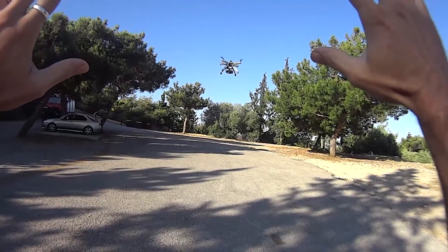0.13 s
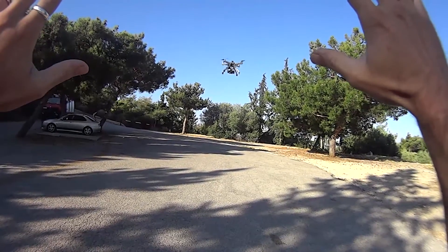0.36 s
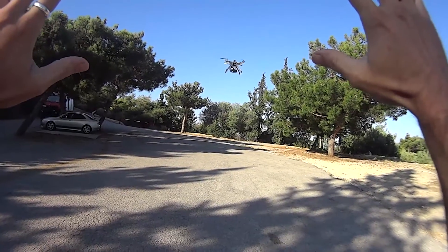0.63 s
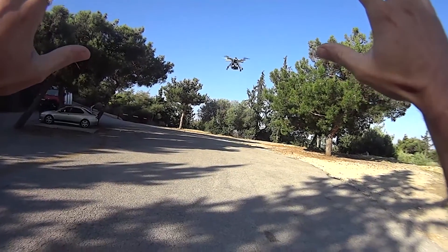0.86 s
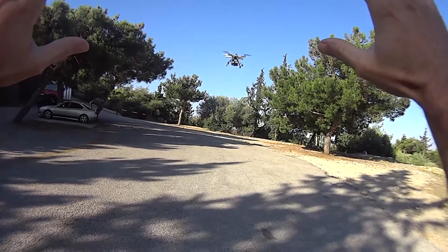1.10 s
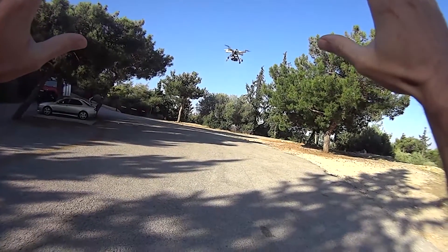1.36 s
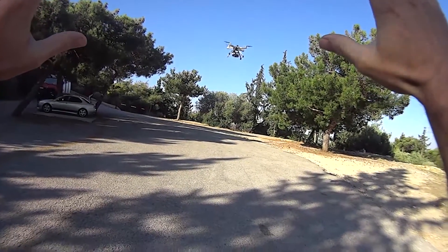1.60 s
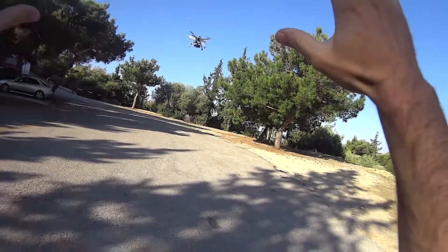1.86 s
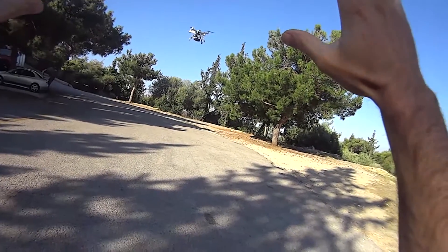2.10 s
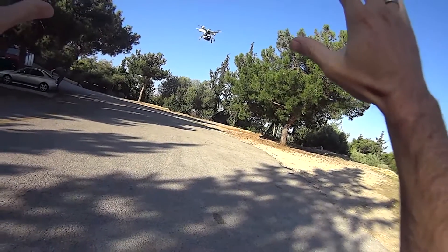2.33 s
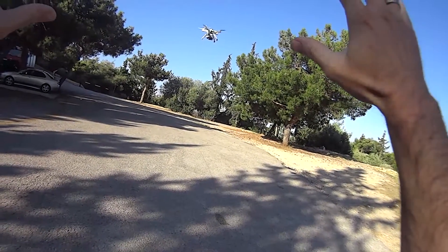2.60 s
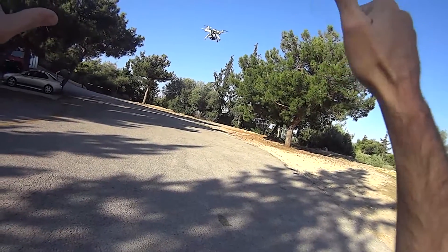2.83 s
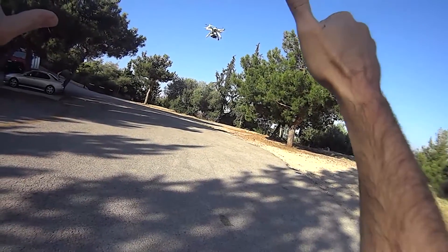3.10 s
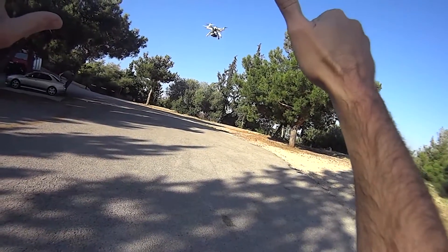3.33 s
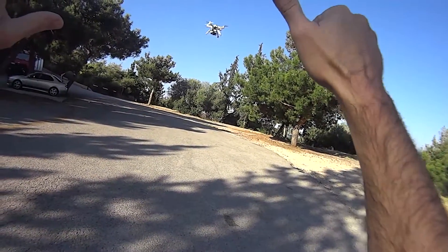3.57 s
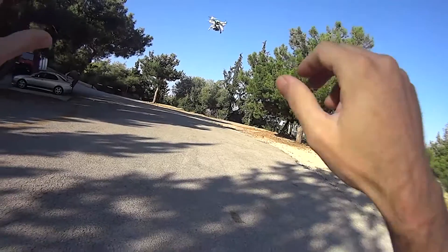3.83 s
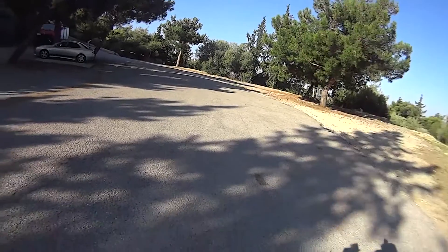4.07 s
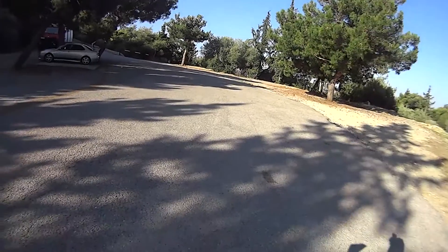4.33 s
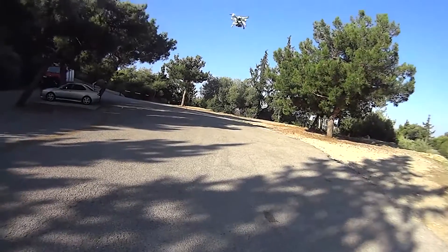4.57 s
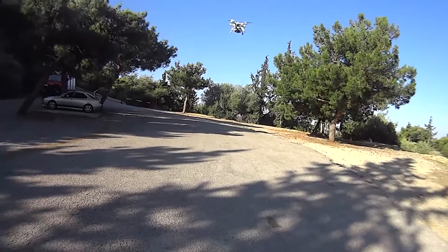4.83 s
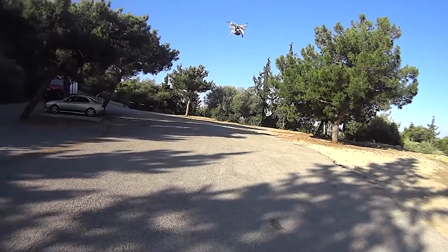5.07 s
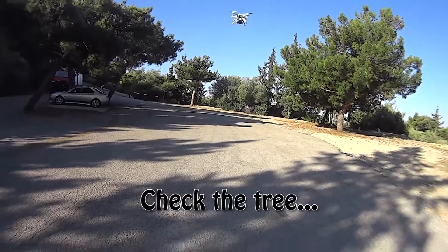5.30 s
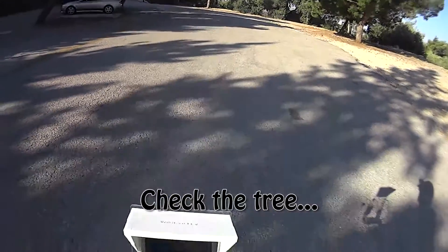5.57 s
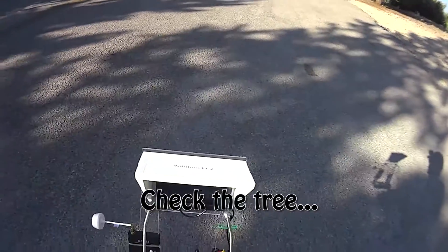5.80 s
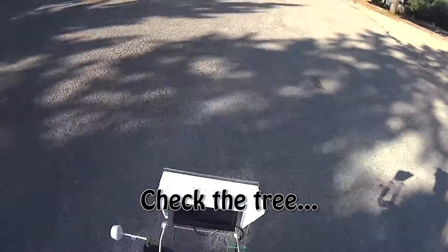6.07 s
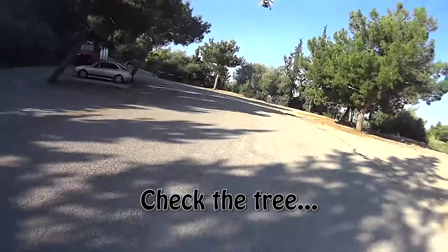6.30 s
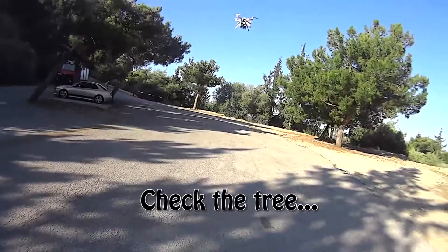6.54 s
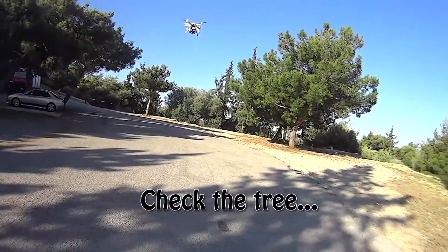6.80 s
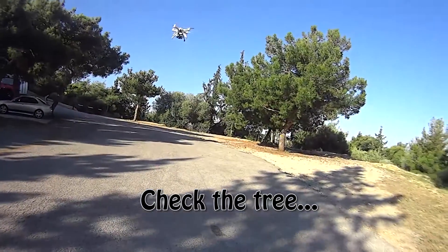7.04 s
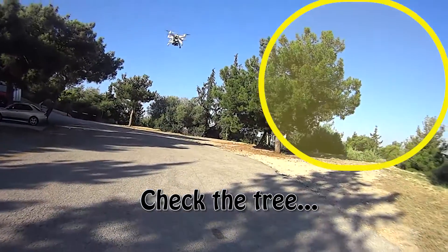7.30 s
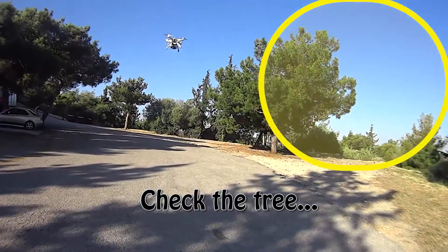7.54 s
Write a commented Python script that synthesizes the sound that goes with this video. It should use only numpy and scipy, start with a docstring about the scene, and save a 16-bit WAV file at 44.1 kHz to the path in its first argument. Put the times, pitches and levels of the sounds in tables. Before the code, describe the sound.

A small quadcopter hovers metres away outdoors, its thin motor whines wavering and clashing over airy propeller hiss and a faint high whistle.

```python
"""An open yard, where a quadcopter hovers some metres away, heard by a small head-worn camera with two sound ports.
Four rotors hunt in speed against the wind. Each adds sine tones for its blades, a motor whine at twelve times
the blade rate with its octave, and blade hiss: noise that pulses once a blade pass. Close sines make a nearly
steady switching whistle. Filtered noise gives light wind, one brush of cloth and the camera's own noise."""
import sys
import numpy as np
from scipy import signal
from scipy.fft import rfft, irfft
from scipy.io import wavfile
from scipy.ndimage import uniform_filter1d

SR = 44100
rng = np.random.default_rng(int(sys.argv[2]) if len(sys.argv) > 2 else 0)


def nominal_scale(level):
    """Amplitude ratio for a level in decibels (scalar or array-like)."""
    x = np.asarray(level, float) / 20
    return 10 ** x


def digitize_waveform(pressure):
    """Quantize a signal to 16-bit integers and store it at the path in sys.argv[1].

    Rows of a 2-D input are taken as channels; values are limited to [-1, 1].
    """
    field = np.atleast_2d(pressure).T
    bounded = np.clip(field, -1, 1)
    quanta = np.round(bounded * 32767).astype(np.int16)
    wavfile.write(sys.argv[1], SR, quanta)


N = 337806  # length in samples
TIME = np.arange(N) / SR  # s
FREQ = np.arange(N // 2 + 1) * SR / N  # Hz

# Colour of each port's own noise: [f/Hz, relative level per Hz/dB]
OWN_COLOUR = [(60, -7), (300, 0.5), (900, -2), (2300, 6), (3500, 2.5), (5000, 0.5), (11000, -5.5)]
# Colour of the wind: [f/Hz, relative level per Hz/dB]
WIND_COLOUR = [(20, -1), (50, -4), (120, -7), (250, -11.5), (600, -56)]
# Wind strength and left-right balance of the drone: [t/s, wind level/dB, left minus right/dB]
WIND_AND_BALANCE = [(0, -67.5, 1), (2.2, -67, 2.5), (5.7, -63, 0.5), (6.15, -58, 0.5), (6.8, -63, 2.5),
                    (7.66, -57.5, 2.5)]
# Cloth brushing the housing: [t/s, level/dB, time to fall to 1/e on either side/s]
CLOTH_BRUSHES = [(6.215, -50, .04)]
# What the housing rings when brushed: [f/Hz, half width at half gain/Hz, level/dB]
HOUSING_RINGS = [(290, 50, -7), (455, 40, 0), (760, 60, -2)]
# Speed controllers that are heard: [f/Hz, relative level/dB]
CONTROLLERS = [(7806, 0), (7815, -12), (7799, -15)]
# Strength of their whistle: [t/s, level/dB]
WHISTLE_LEVEL = [(0.0, -48), (1.47, -51.5), (1.66, -44.5), (1.85, -54), (2.07, -46.5), (3.28, -47),
                 (4.03, -62), (4.1, -49), (4.31, -54), (4.42, -46), (4.48, -58), (4.8, -48), (5.4, -60),
                 (5.5, -45), (5.97, -67), (6.27, -45.5), (6.38, -55), (6.78, -43), (7.4, -50), (7.66, -49)]
# Colour of the blade hiss through the housing: [f/Hz, relative level per Hz/dB]
HISS_COLOUR = [(700, -25.5), (1050, -17.5), (1350, -8), (1800, -6), (2300, 2.5), (2700, -0.5), (3200, -7.5),
               (4250, -9.5), (5050, -4), (5850, -7), (6400, -8), (7100, -10), (8000, -7.5), (8800, -15.5),
               (9500, -10), (10700, -18.5)]
# Swells of the hiss in four ranges:
# [t/s, under 2 kHz level/dB, 2-3 kHz level/dB, 3-4.6 kHz level/dB, above level/dB]
HISS_SWELLS = [(0, 0, -2, 3.5, 3.5), (.5, 0.5, -3.5, 2.5, 0), (2.6, -0.5, -2, 2.5, 0),
               (3, -1, -0.5, -1, -1), (3.4, -3, -1, -9, -1.5), (3.8, 0, -1.5, 1.5, -1.5),
               (5.25, 1, -4, 0.5, -0.5), (5.5, 0.5, 3.5, 6, 0.5), (5.8, 4.5, -1, 5, 0.5),
               (6.15, 1, -2.5, 0, -0.5), (6.7, 3, -1, 6, 2), (7.1, -.5, -1, 2, -1), (7.4, 3, 1.5, 5.5, 1.5),
               (7.66, 1, 1, 6.5, 2)]
# Basic strength of the blade tones: [multiple of the blade rate, fast pair level/dB, slow pair level/dB]
BLADE_TONES = [(1, -75, -64), (2, -69, -72.5), (3, -68, -75), (4, -71.5, -71.5), (5, -71.5, -71.5),
               (6, -73.5, -64.5), (7, -78.5, -62.5), (8, -60, -72), (9, -63.5, -74)]
# Change in level of the blade tones above the first: [t/s, fast pair level/dB, slow pair level/dB]
OVERTONE_SWELLS = [(0, 1.5, 1.5), (1.2, 1, 1), (2, 0.5, -2.5), (4.8, -2.5, -0.5), (5.6, 3.5, 2),
                   (6.3, -1.5, -0.5), (7, -0.5, -0.5), (7.66, 2.5, 4.5)]
# Motor whines: [t/s, rotor 1 level/dB, rotor 3 level/dB, rotor 4 level/dB]
WHINE_LEVELS = [(0, -40.5, -45, -49), (.4, -42.5, -40.5, -41.5), (.8, -43.5, -48, -39),
                (1.3, -48, -47, -47), (1.7, -45, -44, -41.5), (2.2, -44.5, -50.5, -45),
                (2.45, -54, -39, -45), (2.66, -46, -58, -45), (2.9, -45, -38, -40.5),
                (3.5, -45.5, -57, -49.5), (3.8, -49.5, -44, -45), (4.1, -42.5, -66, -58),
                (4.4, -45, -58, -46), (4.6, -52, -56, -56), (4.85, -46, -56, -49), (5.3, -53.5, -50, -53),
                (5.52, -39, -56, -48), (5.72, -45, -45, -49), (5.92, -50, -60, -40), (6.05, -56, -62, -46),
                (6.22, -47, -64, -58), (6.5, -43.5, -49, -64), (6.75, -46, -43.5, -64),
                (7, -44.5, -43, -66), (7.25, -46.5, -58, -63), (7.66, -46, -58, -67)]
# Octave of the first motor's whine: [t/s, level/dB]
OCTAVE_1_LEVEL = [(0, -57), (.7, -60), (1.3, -55), (3.3, -54), (3.6, -61), (4.1, -55), (4.5, -62),
                  (7.66, -63)]
# Blade rate of each rotor as it corrects against the wind, before rounding by inertia: [t/s, f/Hz]
ROTOR_1_RATE = [(0, 210), (.25, 203), (.44, 205.5), (.62, 212.5), (.9, 217.8), (1.2, 211), (1.45, 208),
                (1.65, 209.5), (1.8, 207), (2.03, 213), (2.35, 207.3), (2.57, 211.3), (2.7, 207.5),
                (2.84, 211.3), (3.11, 210.8), (3.65, 205.5), (3.92, 208.5), (4.07, 214.7), (4.25, 209.3),
                (4.55, 213.5), (4.86, 207.8), (5.2, 211.6), (5.55, 211.8), (6.08, 200.5), (6.28, 205),
                (6.42, 211), (6.72, 215.3), (7.07, 197), (7.43, 213), (7.66, 219.5)]
ROTOR_2_RATE = [(0, 215), (.27, 212), (.7, 198.8), (1.22, 215), (1.89, 204.7), (2.4, 213), (3.35, 208),
                (3.6, 217.5), (4.1, 203.5), (4.55, 215), (4.86, 208), (5.26, 215), (6.15, 202.5),
                (6.72, 215), (7.16, 205), (7.45, 219.7), (7.66, 218)]
ROTOR_3_RATE = [(0, 191), (.14, 189.3), (.36, 190.3), (.56, 184), (.81, 190), (1, 187.3), (1.25, 190.7),
                (1.55, 182), (1.85, 181.5), (2.05, 185.3), (2.3, 185.5), (2.43, 182), (2.65, 185),
                (2.95, 182), (3.25, 187.3), (3.5, 190), (3.75, 182.6), (4.32, 188.5), (4.73, 179.5),
                (5.26, 185), (5.72, 188.2), (6, 180.7), (6.3, 172), (6.5, 179), (6.66, 187), (6.86, 185.8),
                (7.1, 174.5), (7.43, 176), (7.66, 182.5)]
ROTOR_4_RATE = [(0, 178.5), (.16, 177.8), (.66, 184.5), (.82, 181.8), (.96, 186.3), (1.48, 181.7),
                (1.62, 184), (1.77, 180), (1.93, 182.5), (2.16, 180), (2.43, 181.8), (2.57, 178.2),
                (2.72, 183.7), (3.1, 182), (3.22, 178.5), (3.45, 177.7), (3.6, 182.5), (3.72, 179),
                (4.1, 175.8), (4.35, 177.7), (4.62, 179.5), (4.86, 174.5), (5.26, 180), (5.52, 175.7),
                (5.67, 180.3), (5.82, 179), (5.96, 182), (6.3, 172.3), (6.65, 178.5), (7.16, 171.4),
                (7.66, 181.7)]
# How the two ports differ: [f/Hz, left minus right/dB, phase by which left leads/rad]
PORT_DIFFERENCES = [(195, -1.5, 0.5), (800, -2.5, 1.81), (1360, -6, 1.04), (1800, -0.5, 0.88),
                    (2420, 0, 0.65), (3180, 0, 0.37), (6300, -0.5, 0.34), (11000, -1, 0.23)]


def on_log(table, column=1):
    """Read a column of a spectrum table at every frequency, along a logarithmic scale."""
    rows = np.array(table, float)
    return np.interp(np.log(FREQ + 1), np.log(rows[:, 0]), rows[:, column])


def curves(table):
    """Read the columns of a time table at every sample."""
    times, *columns = np.transpose(table)
    return [np.interp(TIME, times, column) for column in columns]


def unit(x):
    """Scale to rms 1."""
    return x / np.sqrt(np.mean(x ** 2))


def shape(x, gain):
    """Filter by a gain for each frequency."""
    return irfft(rfft(x) * gain, N)


def walk(rate):
    """Draw a random level every 1 / rate seconds, smooth the steps twice and scale to rms 1."""
    hold = int(SR / rate)
    steps = np.repeat(rng.standard_normal(N // hold + 1), hold)
    smooth = uniform_filter1d(uniform_filter1d(steps, hold), hold)
    return unit(smooth[:N])


def tone(turns, db, flicker_db, rate):
    """A sine whose level and phase flicker as the air between moves."""
    level = np.sqrt(2) * nominal_scale(db + flicker_db * walk(rate))  # the root makes the level an rms
    phase = turns + 0.086 * walk(rate) + rng.random()  # in turns
    return level * np.sin(2 * np.pi * phase)


def own_noise():
    """Steady coloured noise, separate at each port."""
    noise = shape(rng.standard_normal((2, N)), nominal_scale(on_log(OWN_COLOUR)))
    return nominal_scale(-47) * unit(noise)


def wind(db):
    """Wind buffets softly as mostly low noise, nearly the same at both ports."""
    gust_db, gust_rate = 2.0, 9  # spread in dB, new levels per second
    colour = nominal_scale(on_log(WIND_COLOUR))
    both = unit(shape(rng.standard_normal(N), colour))
    apart = unit(shape(rng.standard_normal(N), colour))
    buffeting = both + 0.13 * apart * np.array([[1], [-1]])
    return nominal_scale(db + gust_db * walk(gust_rate)) * buffeting


def cloth_brush():
    """Rubbing cloth rings the housing in a short dull rustle, partly different at each port."""
    housing = sum(nominal_scale(db) / (1 + ((FREQ - hz) / width) ** 2) for hz, width, db in HOUSING_RINGS)
    shared = rng.standard_normal(N)
    separate = 0.5 * rng.standard_normal((2, N))
    rub = unit(shape(shared + separate, housing))
    swell = sum(nominal_scale(db) * np.exp(-((TIME - t) / fall) ** 2) for t, db, fall in CLOTH_BRUSHES)
    return rub * swell


def switching_whistle(db, turns):
    """Controllers switch at close, nearly fixed rates that beat; passing blades chop them into side tones."""
    whistle = 0
    for hz, own_db in CONTROLLERS:
        clock = np.cumsum(hz + 2.5 * walk(3)) / SR  # each rate drifts by a few Hz
        whistle = whistle + tone(clock, db + own_db, flicker_db=1.4, rate=16)
    chop = 1 + 0.28 * np.cos(2 * np.pi * turns)
    return chop * whistle


def pulsing_air(turns):
    """Each passing blade stirs the air, so plain noise pulses once a blade pass."""
    pulse = 1 + 0.31 * np.cos(2 * np.pi * (turns + rng.random()))
    return pulse * rng.standard_normal(N)


def blade_hiss(air, swells_db):
    """The stirred air is coloured into hiss; four neighbouring ranges swell apart, and each flickers."""
    below = [1 / (1 + (FREQ / hz) ** 8) for hz in (2000, 3050, 4600)]
    below = [0] + below + [1]  # from nothing up to the whole spectrum
    colour = nominal_scale(on_log(HISS_COLOUR)) * (FREQ > 400)
    hiss = 0
    for lower, upper, swell_db in zip(below, below[1:], swells_db):
        part = shape(air, colour * (upper - lower))
        hiss = hiss + part * nominal_scale(swell_db + 0.9 * walk(10))
    return nominal_scale(-36) * unit(hiss)


def motor_whine(turns, whine_db, octave_db):
    """The motor sings at 12 times the blade rate; passing blades chop this into side tones one blade rate away."""
    order = 12  # whine cycles per blade pass
    chop = 1 + 0.35 * np.cos(2 * np.pi * turns)
    whine = chop * tone(order * turns, whine_db, flicker_db=2.4, rate=14)
    octave = tone(2 * order * turns, octave_db, flicker_db=3.0, rate=20)
    return whine + octave


def blade_tones(turns, pair, low_hiss_db, overtones_db):
    """Blades passing at a regular rate give tones at whole multiples of that rate."""
    tones = 0
    for row in BLADE_TONES:
        multiple, db = row[0], row[1 + pair]
        # as the head turns the higher tones swell and the lowest sink, along with the low hiss
        db = db + (multiple - 3) / 4 * low_hiss_db
        if multiple > 1:
            db = db + overtones_db
        tones = tones + tone(multiple * turns, db, flicker_db=2.5, rate=9)
    return tones


def blade_turns(hz):
    """The rotor's inertia rounds every change of speed; adding up the rate counts the blade passes."""
    lag_s = 0.06  # time over which the speed is averaged
    hz = uniform_filter1d(hz, size=int(lag_s * SR))
    unsteady = 1 + 0.0015 * walk(16)
    return np.cumsum(hz * unsteady) / SR


def ports(x, balance_db):
    """The two ports hear the drone with different colour, phase and level."""
    side = np.array([[1], [-1]]) / 2  # each port takes half of the difference
    colour = nominal_scale(side * on_log(PORT_DIFFERENCES))
    phase = np.exp(1j * side * on_log(PORT_DIFFERENCES, column=2))
    return shape(x, colour * phase) * nominal_scale(side * balance_db)


def scene():
    """The four rotors and the whistle reach the ports, over wind, cloth and the ports' own noise."""
    wind_db, balance_db = curves(WIND_AND_BALANCE)
    swells_db = curves(HISS_SWELLS)
    overtones_db = curves(OVERTONE_SWELLS)
    whine_1, whine_3, whine_4 = curves(WHINE_LEVELS)
    whines_db = [whine_1, -57, whine_3, whine_4]  # the second motor whines only faintly
    octaves_db = curves(OCTAVE_1_LEVEL) + [db - 22 for db in whines_db[1:]]

    rates = (ROTOR_1_RATE, ROTOR_2_RATE, ROTOR_3_RATE, ROTOR_4_RATE)
    turns = [blade_turns(curves(rate)[0]) for rate in rates]
    air = sum(pulsing_air(passes) for passes in turns)
    drone = switching_whistle(*curves(WHISTLE_LEVEL), turns[3]) + blade_hiss(air, swells_db)
    for k in range(4):
        pair = k // 2  # rotors 1 and 2 are the fast pair, 3 and 4 the slow pair
        drone = drone + motor_whine(turns[k], whines_db[k], octaves_db[k])
        drone = drone + blade_tones(turns[k], pair, swells_db[0], overtones_db[pair])

    return own_noise() + wind(wind_db) + cloth_brush() + ports(drone, balance_db)


def top_cut(x):
    """Nothing passes above the cut-off."""
    return signal.sosfilt(signal.butter(12, 11520, fs=SR, output="sos"), x)


def record(dry):
    """The camera cuts the top of the sound with a steep low-pass filter."""
    top_hz = 10960
    low_pass = signal.ellip(10, 0.2, 80, top_hz, fs=SR, output="sos")  # 0.2 dB ripple, 80 dB cut
    mix = signal.sosfilt(low_pass, dry)
    return top_cut(mix)


dry = scene()
out = record(dry)
digitize_waveform(out)
```